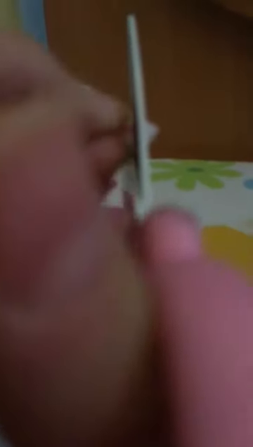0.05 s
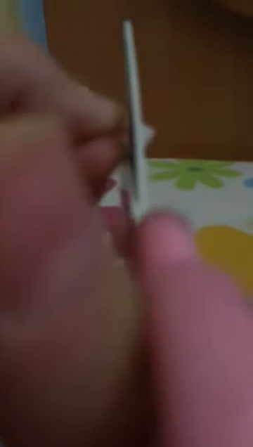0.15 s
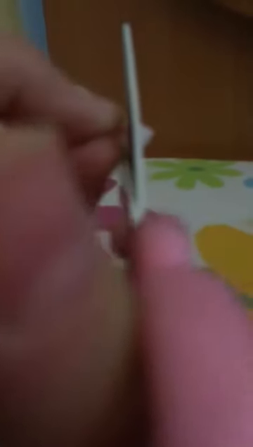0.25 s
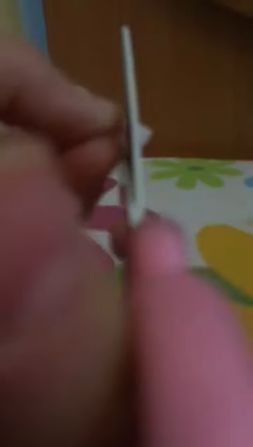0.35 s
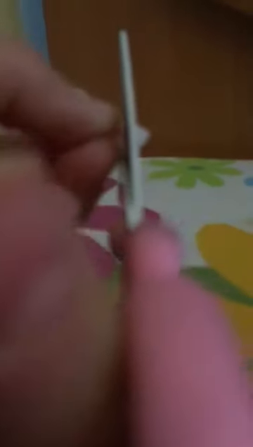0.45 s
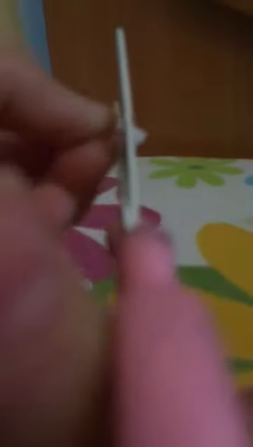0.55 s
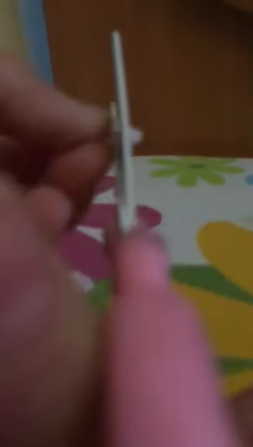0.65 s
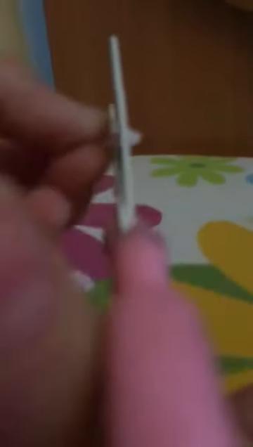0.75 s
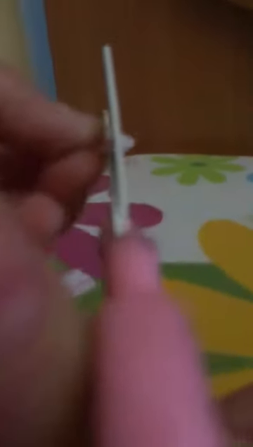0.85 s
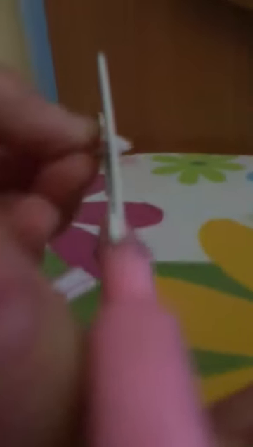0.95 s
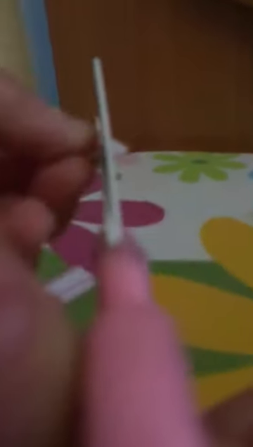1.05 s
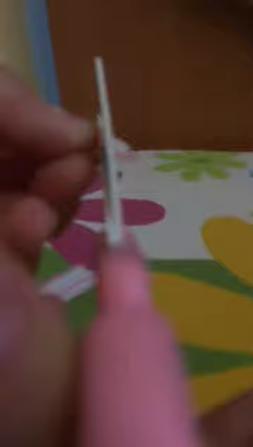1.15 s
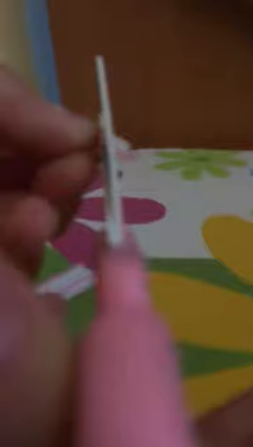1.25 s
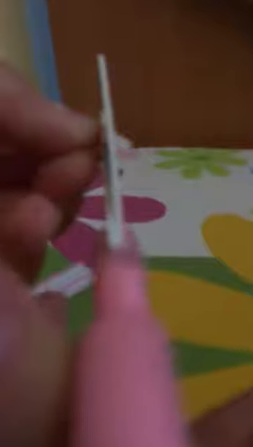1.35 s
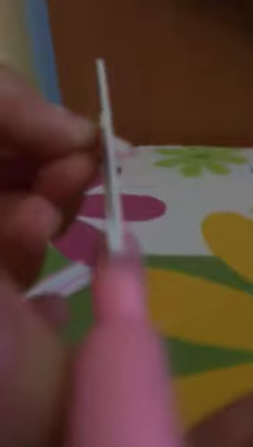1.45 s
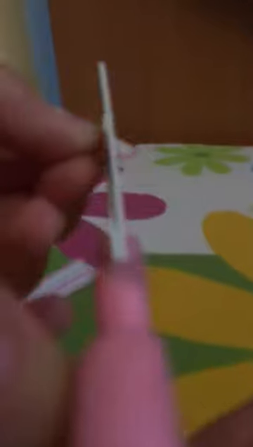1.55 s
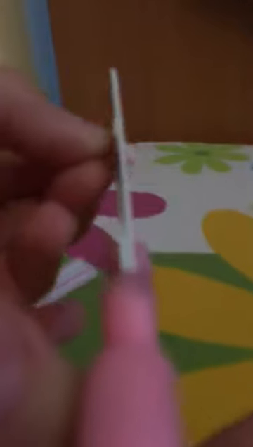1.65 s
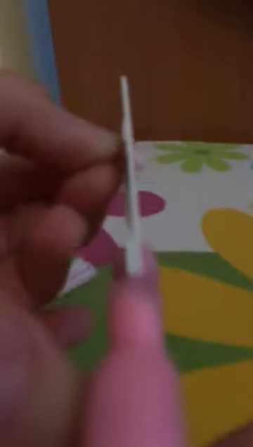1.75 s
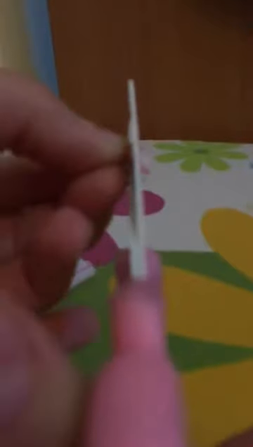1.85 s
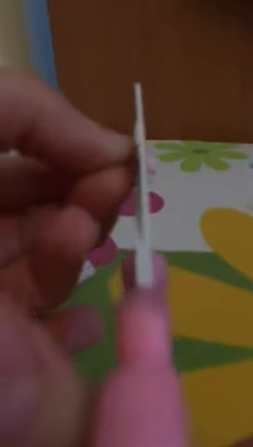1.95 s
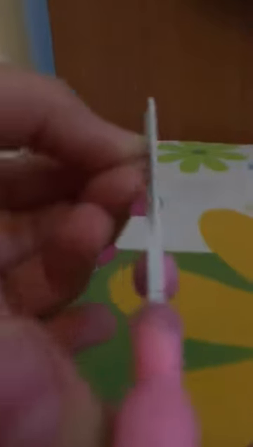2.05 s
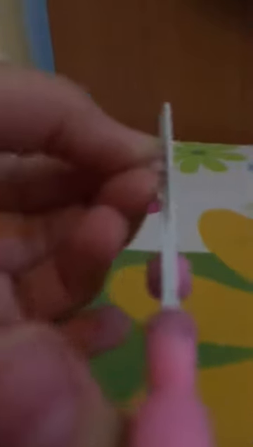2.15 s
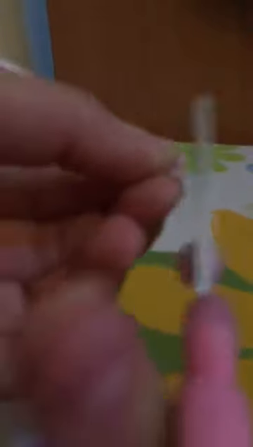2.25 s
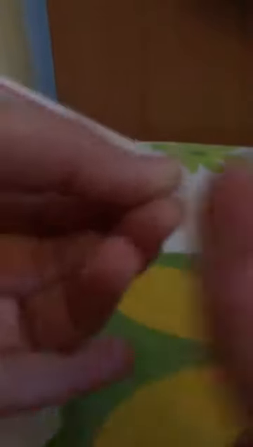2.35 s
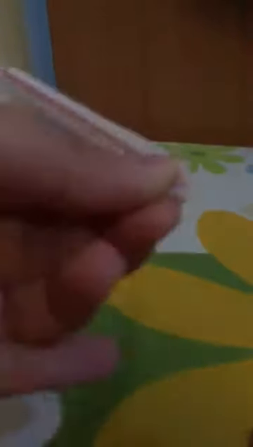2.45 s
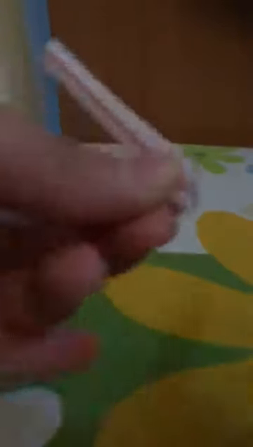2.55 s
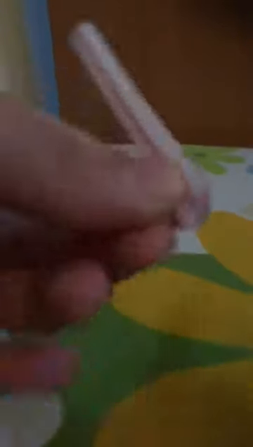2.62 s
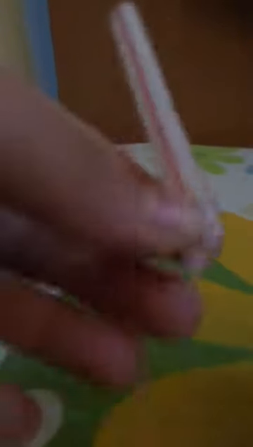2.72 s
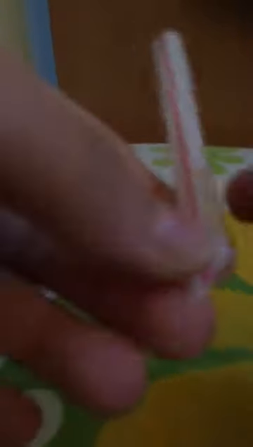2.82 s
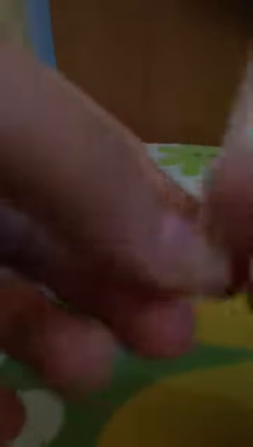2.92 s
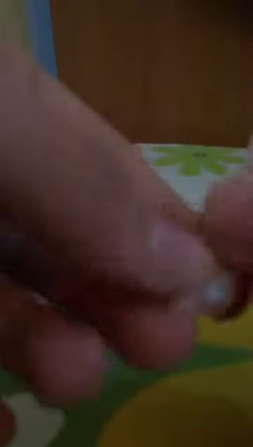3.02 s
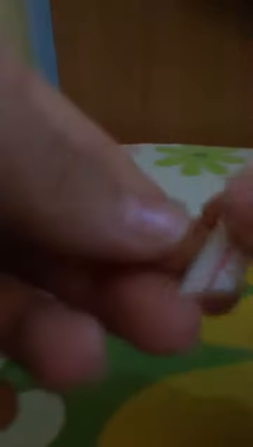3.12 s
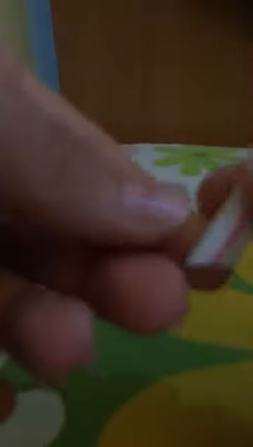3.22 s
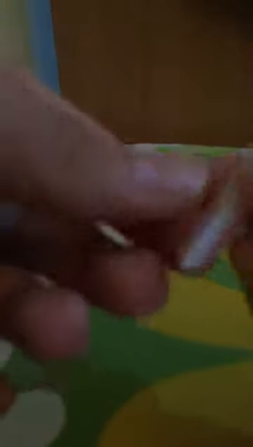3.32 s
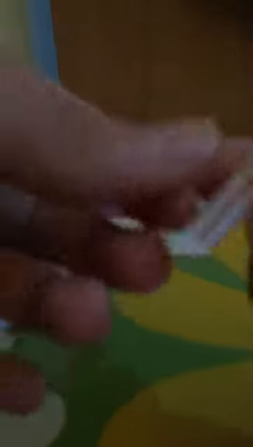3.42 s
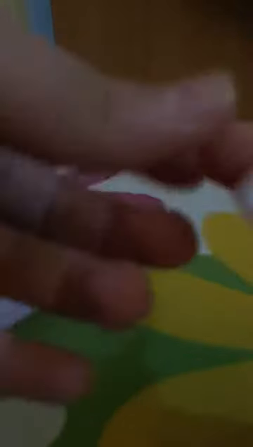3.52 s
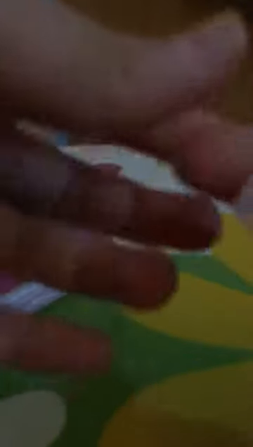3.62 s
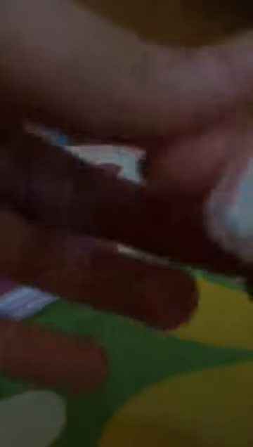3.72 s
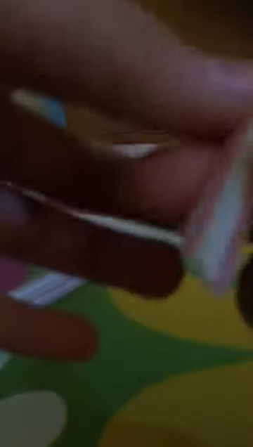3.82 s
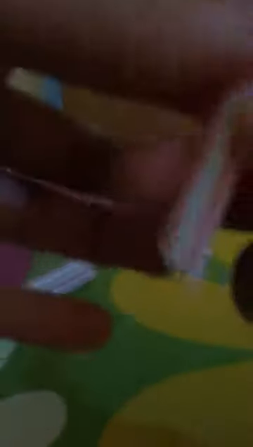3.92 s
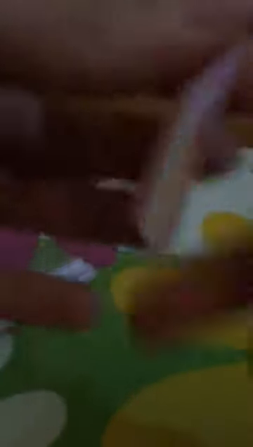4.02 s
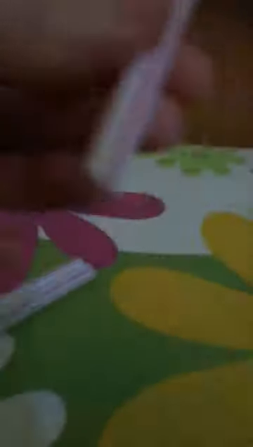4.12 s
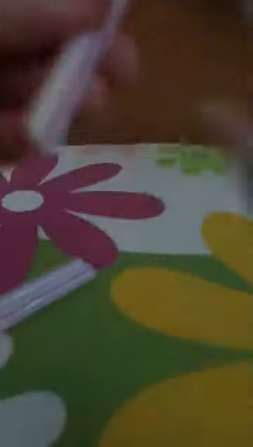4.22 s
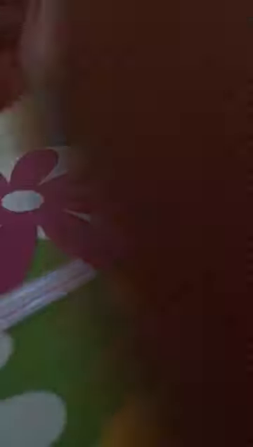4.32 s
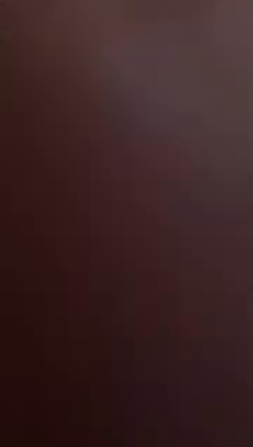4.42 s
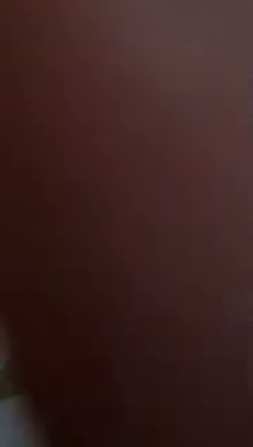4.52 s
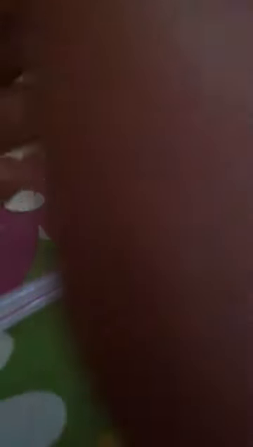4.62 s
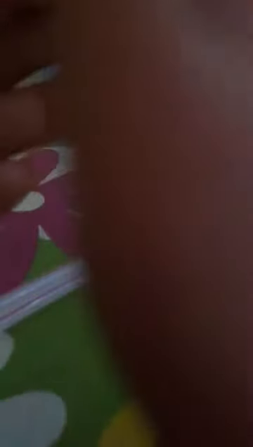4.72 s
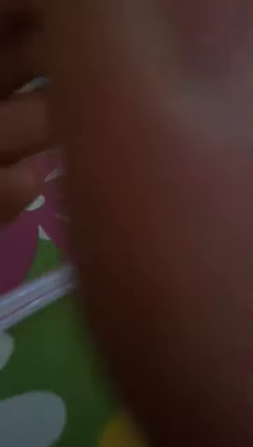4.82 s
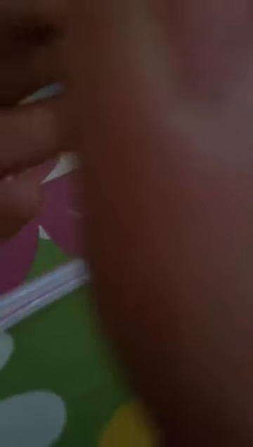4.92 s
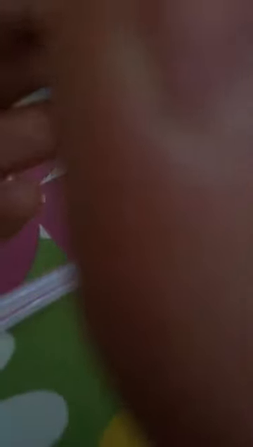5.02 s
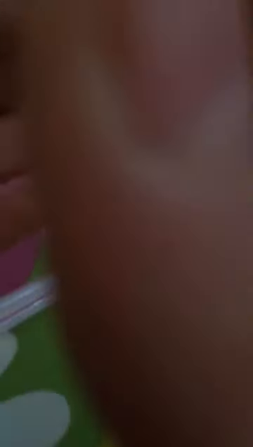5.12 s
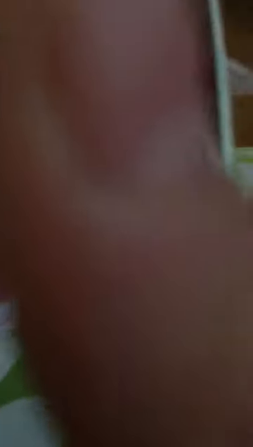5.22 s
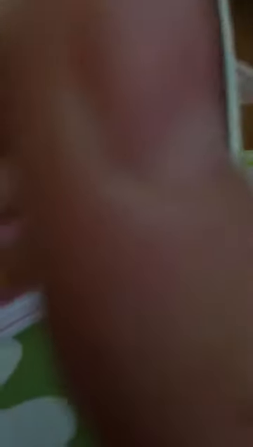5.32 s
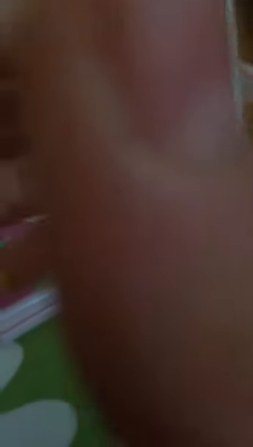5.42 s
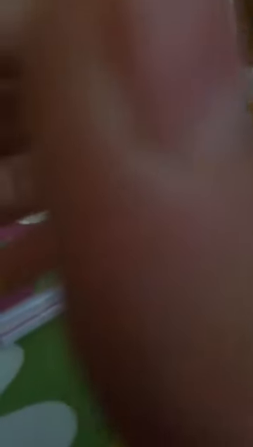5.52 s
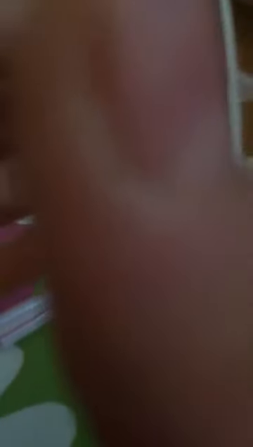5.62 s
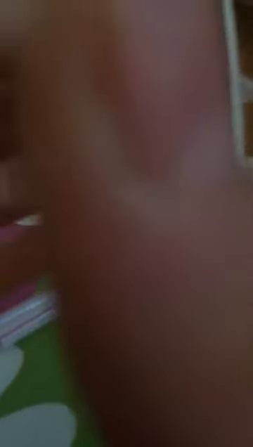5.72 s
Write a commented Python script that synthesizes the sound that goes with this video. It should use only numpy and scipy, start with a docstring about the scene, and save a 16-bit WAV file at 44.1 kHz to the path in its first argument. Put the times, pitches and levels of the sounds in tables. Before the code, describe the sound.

In a small quiet room, very close to a phone microphone, scissors click faintly, creak, then snip through a plastic straw in a quick sharp run. The pinched end pops open loudly, and fingers rub and tap the short piece. A low unsteady appliance hum and soft hiss continue beneath.

```python
"""A small quiet room, a phone close by: scissors close on a plastic drinking straw. Stick-slip noise makes the
scrapes, clusters of dying sines the clicks; falling low swings and rattling noise shake the phone's case. The
pinched straw pops open, then fingers rub and tap the cut piece, which rings like a short open pipe: noise and
taps drive its modes. Behind are an appliance's narrow-band hum near 100 Hz, low rumble, faint whines and hiss."""
import sys
import numpy as np
from scipy import signal
from scipy.fft import rfft, irfft, next_fast_len
from scipy.io import wavfile
from scipy.ndimage import uniform_filter1d

SR = 44100
rng = np.random.default_rng(int(sys.argv[2]) if len(sys.argv) > 2 else 0)


def to_linear_factor(level_db):
    """Convert decibel levels (scalar or array-like) to linear amplitude factors."""
    exponent = np.asarray(level_db, float) / 20
    return 10 ** exponent


def wrap_up_sound(samples):
    """Save the sound to the file named by the first command line argument, as 16-bit audio."""
    columns = np.atleast_2d(samples).T
    # keep every value between -1 and 1, then stretch to whole-number steps
    tamed = np.clip(columns, -1, 1)
    steps = np.round(tamed * 32767).astype(np.int16)
    wavfile.write(sys.argv[1], SR, steps)


N = 254456

# Blade and handle clicks. Each row: start in seconds, level in dB, tilt in dB per octave (harder = brighter),
# gain of the outer modes in dB an octave off.
BLADE_CLICKS = [(0.672, -42, -0.5, 5), (0.6798, -52, -7, 1), (0.6874, -50.5, -3, .3), (0.7054, -65, 4, 9),
                (0.7344, -58, 5, -4), (2.077, -31, 16.5, 5), (2.1174, -42, 18.5, 0), (2.1484, -63, -8, -4),
                (2.1574, -45.5, 7.5, 4), (2.1666, -21.5, 11, 3), (2.1874, -56.5, 1.5, 8.5),
                (2.2347, -54, -4.5, 5), (2.3372, -29, 9.5, 4), (2.363, -36, 8.5, -2),
                (3.1313, -36.5, 12, -3.5), (4.2958, -31.5, 3, -8.5), (4.5241, -41, -2.2, 6.5),
                (4.5284, -62.5, -1.5, 16.5), (5.4883, -43, -6, -4), (5.682, -47.5, 9, 7)]
# Modes of the scissors. Each row: pitch in Hz, level in dB, t60 in seconds.
SCISSOR_MODES = [(1770, 0, 0.007), (2650, -0.5, 0.0093), (4250, -1, 0.012), (6600, -1.5, 0.0058),
                 (8570, 1, 0.0055)]
# Blades scraping on the plastic. Each row: peak in seconds, level in dB, rise in seconds, fall in seconds.
BLADE_SCRAPES = [(.67, -53.5, 0.0047, .02), (.72, -80, .15, 0.13), (2.085, -51, 0.024, 0.046),
                 (2.107, -52, 0.044, 0.023), (2.155, -44.5, 0.0067, 0.025), (2.168, -40, .006, 0.012),
                 (2.19, -67.5, 0.045, 0.2), (2.322, -64.5, 0.0068, .08), (4.528, -76, .1, 0.047)]
# Colour of the scrape. Each row: frequency in Hz, relative density in dB per Hz.
SCRAPE_SPECTRUM = [(300, -37), (1500, -13.5), (3000, -9.5), (4000, 0), (5200, 0.5), (6500, -8),
                   (8000, -18.5), (10000, -10), (11200, -30)]
# Scissors creaking under the grip. Each row: peak in seconds, level in dB, rise in seconds, fall in seconds.
GRIP_CREAKS = [(1.59, -65.5, .06, 0.055), (1.71, -65, 0.065, 0.55), (1.95, -72.5, 0.27, .13)]
# Colour of the creak. Each row: frequency in Hz, relative density in dB per Hz.
CREAK_SPECTRUM = [(200, 2.5), (400, -1), (900, -8.5), (1800, -11), (2100, -12.5), (2850, -6), (3600, -16.5),
                  (6000, -19), (10000, -23)]
# Tiny squeaks. Each row: start in seconds, level in dB, pitch in Hz, t60 in seconds.
TINY_SQUEAKS = [(.6715, -45, 1310, 0.016), (.729, -60, 5000, .012), (2.473, -50.5, 1525, 0.032),
                (2.087, -48, 1430, 0.02), (4.215, -57.5, 1540, 0.039), (4.228, -58, 1400, 0.044),
                (4.28, -53, 1270, 0.033), (5.663, -37, 4110, 0.015), (5.662, -47, 5730, 0.018)]

# Taps and creases of the straw. Each row: start in seconds, level of the second mode in dB,
# tilt in dB per octave, gain of the outer modes in dB an octave off.
STRAW_TAPS = [(2.5545, -53.5, 7.5, -3.5), (2.5662, -57, 8.5, -2.5), (3.2266, -49.5, 1, 1),
              (3.2525, -47, 4, -9), (3.4189, -38.5, -4, -8), (3.6391, -59.5, -6, 8.5),
              (4.15, -48.5, -11, 0), (4.7072, -71.5, -15.5, 10.5), (4.7586, -70.5, -16, 11),
              (4.9072, -62.5, -5.5, 15.5), (4.951, -69.5, -18, 7), (4.9794, -72, -6, 7),
              (5.157, -58, -6, 4), (5.1647, -60, -4.5, 16), (5.249, -50.5, -3.5, -0.5),
              (5.307, -37, -11, -12)]
# Air column of the open straw. Each row: pitch in Hz, level in dB, t60 in seconds when tapped.
PIPE_MODES = [(2320, 0, .019), (4700, 0, .014), (7080, 0, .013), (9480, 0, .011)]
# Dry crack of the straw's wall. Each row: pitch in Hz, level in dB, t60 in seconds.
WALL_MODES = [(3300, -20, 0.0017), (5800, -12, .004), (8300, -11.5, .004)]
# The pinched straw springs open. One row: start in seconds, level in dB.
POP_OPEN = (2.5782, -7.8)
# The flattened straw. Each row: pitch in Hz, level in dB, t60 in seconds.
PINCHED_MODES = [(1010, -22.5, 0.0072), (2033, -11, 0.024), (2406, -12, 0.0088), (2950, -7.5, .007),
                 (3451, -16.5, 0.007), (4290, -5, 0.0088), (4720, -3, 0.014), (5900, -11, .005),
                 (6620, -2.5, 0.0056), (7224, 5, 0.0059), (8140, -17, 0.0089), (8600, -10, 0.0079),
                 (9650, 5.5, .0065)]
# Fingers sliding on the straw. Each row: peak in seconds, level of the soft rub in dB, rise in seconds,
# fall in seconds, drive of the rustle over the rub in dB.
FINGER_RUBS = [(3.134, -59.5, .012, 0.021, 6.5), (3.225, -67, 0.019, 0.035, 1),
               (3.268, -61.5, 0.019, 0.024, 5.3), (3.425, -64.5, 0.0093, 0.11, -3),
               (3.446, -60.5, 0.038, 0.032, 1), (3.505, -62, 0.069, 0.14, -2), (3.957, -80, 0.044, 0.11, 9),
               (4.022, -77, 0.0065, 0.043, 15.5), (4.061, -56.5, 0.024, 0.013, 0.8),
               (4.22, -77, 0.013, 0.025, 13), (4.295, -70, 0.042, 0.016, 15.5),
               (4.711, -62, 0.013, .022, -21), (4.917, -56.5, 0.024, 0.046, -11),
               (5.03, -74.5, 0.036, 0.051, -2.5), (5.163, -56.5, 0.019, 0.031, -16.5),
               (5.25, -67.5, 0.15, .2, -5), (5.313, -49.5, 0.035, 0.053, 1),
               (5.492, -58.5, 0.018, 0.015, -10), (5.53, -74, 0.081, 0.22, -1.5),
               (5.687, -61, 0.035, 0.016, -8.5), (5.75, -73, 0.096, 0.09, -11)]
# Colour of the rustle. Each row: frequency in Hz, relative density in dB per Hz.
RUSTLE_SPECTRUM = [(1200, -45), (2500, -20), (4700, 5.5), (6000, 3), (8000, -2), (9600, 3), (10300, -43),
                   (11200, -90)]
# Straw with a finger over one end. Each row: pitch in Hz, level in dB, t60 in seconds.
COVERED_MODES = [(1500, -11.5, 0.032), (3640, 5, 0.0092), (4750, -6, 0.0038), (6100, -8, 0.012),
                 (8160, -11.5, 0.016)]
# Sliding on the covered straw. Each row: peak in seconds, level in dB, rise in seconds, fall in seconds.
COVERED_RUBS = [(4.218, -69, .013, .1), (4.264, -57.5, 0.03, 0.047), (4.285, -66, 0.055, .01)]
# Taps on the covered straw. Each row: start in seconds, level in dB.
COVERED_STRAW_TAPS = [(4.2682, -36)]

# Bumps through the phone's case, and the low thud of the straw popping open at 2.5786 s. Each row: start in
# seconds, level in dB, starting pitch in Hz, t60 in seconds.
CASE_BUMPS = [(0.671, -48, 248, 0.037), (1.582, -51, 400, 0.055), (2.085, -46.5, 410, 0.025),
              (2.1665, -38, 545, 0.09), (2.171, -27, 148, 0.066), (2.234, -42.5, 450, 0.063),
              (2.422, -47, 480, 0.036), (2.5786, -47.5, 901, .015), (4.5236, -31.5, 890, 0.012),
              (4.5258, -24, 277, 0.038), (4.531, -27.5, 93, .055), (4.553, -46, 397, 0.035)]
# Case rattling in the hand. Each row: peak in seconds, level in dB, rise in seconds, fall in seconds.
CASE_RATTLES = [(2.095, -56, 0.041, 0.036), (2.17, -46.5, 0.016, 0.032), (2.24, -59, 0.043, 0.068),
                (2.42, -64.5, .2, 0.16), (4.53, -55.5, .008, 0.096), (4.555, -62, 0.028, 0.039)]
# Colour of the rattle. Each row: frequency in Hz, relative density in dB per Hz.
RATTLE_SPECTRUM = [(120, -4), (300, 4), (700, -10), (1500, -15.5), (3000, -28.5)]

# Decay of the room. Each row: frequency in Hz, t60 in seconds.
ROOM_DECAY = [(300, .25), (2000, .26), (6000, .24), (11000, .2)]
# Nearest surfaces. Each row: delay in seconds, level in dB.
NEAR_ECHOES = [(0.0138, -31), (.024, -38.5)]

# Hum outside its dips. Each row: time in seconds, level in dB.
HUM_LEVEL = [(0, -50.5), (.39, -51), (.75, -50.5), (1.01, -59.5), (1.2, -50), (1.5, -54.5), (2.0, -51.5),
             (2.19, -48), (2.31, -52), (2.68, -57), (2.88, -46), (2.94, -53.5), (3.57, -53), (3.86, -56),
             (3.97, -47.5), (4.37, -54.5), (4.65, -49), (5.06, -53), (5.33, -48), (5.45, -52), (5.71, -46),
             (5.77, -50.5)]
# Brief dips of the hum. Each row: centre in seconds, depth in dB.
HUM_DIPS = [(.13, -10), (.43, -23), (.57, -5.5), (1.27, -17), (1.43, -12), (2.25, -8), (3.21, -20.5),
            (3.34, -29), (3.61, -4.5), (3.74, -7), (3.91, -24), (4.58, -15), (4.96, -7), (5.64, -11)]
# Wandering rumble. Each row: time in seconds, level in dB.
RUMBLE_LEVEL = [(0.0, -62.5), (1.3, -58.5), (1.98, -64), (2.19, -62), (2.47, -61.5), (3.74, -64),
                (4.5, -54.5), (4.71, -59.5), (5.43, -55), (5.77, -65)]
# Colour of the rumble. Each row: frequency in Hz, relative density in dB per Hz.
RUMBLE_SPECTRUM = [(20, -37.5), (32, -15.5), (48, 14), (70, 7.5), (85, 0), (110, -46)]
# Faint unsteady tones. Each row: pitch in Hz, level in dB.
FAINT_WHINES = [(1730, -89), (6950, -90.5)]
# Room noise and hiss ahead of its top cut. Each row: frequency in Hz, relative density in dB per Hz.
AIR_SPECTRUM = [(74, -33.5), (125, 1), (187, -1), (256, -12), (516, -22), (598, -20), (803, -24),
                (1230, -26), (1400, -29), (1840, -27), (4880, -31.5), (6800, -33.5), (10200, -36),
                (13300, -68), (22000, -120)]


def scissors():
    """Steel on plastic: stick-slip scrapes and creaks, squeaks of single modes, clicks of mode clusters."""
    scrape = strokes(BLADE_SCRAPES) * coloured(gritty(spread_db=2.5), SCRAPE_SPECTRUM)
    creak = strokes(GRIP_CREAKS) * coloured(gritty(spread_db=2), CREAK_SPECTRUM)
    squeaks = np.zeros(N)
    for s, db, hz, t60_s in TINY_SQUEAKS:
        add(squeaks, s, ring([(hz, db, t60_s)], attack_s=0.0022))
    centre_hz = SCISSOR_MODES[2][0]
    clicks = blows(BLADE_CLICKS, SCISSOR_MODES, centre_hz, attack_s=0.00037, spread=0.22, count=10)
    return scrape + creak + squeaks + clicks


def straw():
    """Everything the straw does: taps, the pop and the rubbing."""
    return straw_taps() + straw_pop() + straw_rubs()


def straw_taps():
    """A tap rings the open air column and cracks the wall; covering one end changes the modes."""
    centre_hz = PIPE_MODES[1][0]
    out = blows(STRAW_TAPS, PIPE_MODES, centre_hz, attack_s=0.00065, spread=0.014, count=1)
    out += blows(STRAW_TAPS, WALL_MODES, centre_hz, attack_s=0.0003, spread=0.2, count=6)
    for s, db in COVERED_STRAW_TAPS:
        add(out, s, to_linear_factor(db) * ring(COVERED_MODES, attack_s=0.00026))
    return out


def straw_pop():
    """Springing open strikes all modes of the flattened straw at once."""
    out = np.zeros(N)
    s, db = POP_OPEN
    add(out, s, to_linear_factor(db) * ring(PINCHED_MODES, attack_s=0.00031))
    return out


def straw_rubs():
    """Friction drives the air column: a soft rub its lowest mode, a rustle the upper ones."""
    soft_gain = strokes([row[:4] for row in FINGER_RUBS])
    rustle_gain = strokes([(s, db + over, rise, fall) for s, db, rise, fall, over in FINGER_RUBS])
    # the finger pad damps the mode it drives
    damped = [(hz, db, 0.7 * t60_s) for hz, db, t60_s in PIPE_MODES[:1]]
    soft = soft_gain * sounded(damped, spread_db=3.5)
    covered = strokes(COVERED_RUBS) * sounded(COVERED_MODES, spread_db=0.5)
    upper = 0.75 * sounded(PIPE_MODES[1:], spread_db=4)
    surface = 0.7 * coloured(gritty(spread_db=1.5), RUSTLE_SPECTRUM)
    return soft + covered + rustle_gain * (upper + surface)


def case_bumps():
    """A knock on the case, or the low thud of the pop, is a swing that slows as it dies; the case then rattles
    as gritty noise."""
    out = np.zeros(N)
    t = np.arange(SR // 4) / SR
    slowing = 0.6  # 1 = steady pitch
    for s, db, hz, t60_s in CASE_BUMPS:
        cycles = ((hz * t + 1) ** slowing - 1) / slowing
        add(out, s, to_linear_factor(db - 60 * t / t60_s) * np.sin(2 * np.pi * cycles))
    return out + strokes(CASE_RATTLES) * coloured(gritty(spread_db=3), RATTLE_SPECTRUM)


def room(x, tail_db):
    """Two near echoes, then a noise tail that builds up while each frequency dies at its own speed."""
    hz, t, z = signal.stft(rng.standard_normal(SR // 2), SR, nperseg=256)
    decay = to_linear_factor(-60 * t / along(ROOM_DECAY, hz)[:, None])
    buildup = 1 - 0.79 * np.exp(-(t / 0.031) ** 2)
    tail = signal.istft(z * decay * buildup, SR, nperseg=256)[1]
    tail = tail * to_linear_factor(tail_db) / np.linalg.norm(tail)
    response = np.pad(tail, (SR // 200, 0))  # tail starts 5 ms late
    for delay_s, db in NEAR_ECHOES:
        response[round(delay_s * SR)] += to_linear_factor(db)
    return signal.fftconvolve(x, response)[:N]


def background():
    """Sum of the steady sources."""
    return hum() + rumble() + whines() + hiss()


def hum():
    """The appliance: a narrow noise band that wavers and dips briefly."""
    t = np.arange(N) / SR
    half_dip_s = 0.039
    dips_db = sum(db * np.maximum(1 - abs(t - s) / half_dip_s, 0) for s, db in HUM_DIPS)
    return gains(HUM_LEVEL) * to_linear_factor(dips_db) * narrow(100.94, width_hz=7.6)


def rumble():
    """Low noise of wandering level."""
    return gains(RUMBLE_LEVEL) * coloured(rng.standard_normal(N), RUMBLE_SPECTRUM)


def whines():
    """Narrow noise bands heard as faint unsteady tones."""
    return sum(to_linear_factor(db) * narrow(hz, width_hz=29) for hz, db in FAINT_WHINES)


def hiss():
    """Room noise and microphone hiss: coloured noise that ends abruptly at the top."""
    noise = coloured(rng.standard_normal(N), AIR_SPECTRUM)
    return to_linear_factor(-61.5) * filtered(noise, lambda hz: 1 / (1 + (hz / 10400) ** 140))


def blows(events, modes, centre_hz, attack_s, spread, count):
    """Contacts strike the same modes; hardness tilts them, place favours the outer or the middle ones."""
    out = np.zeros(N)
    octaves = np.log2(np.array(modes)[:, 0] / centre_hz)
    for s, db, tilt, bend in events:
        struck = [(hz, mode_db + tilt * x + bend * x ** 2, t60_s)
                  for (hz, mode_db, t60_s), x in zip(modes, octaves)]
        add(out, s, to_linear_factor(db) * ring(struck, attack_s, spread, count))
    return out


def ring(modes, attack_s, spread=0, count=1):
    """One blow: each mode is a cluster of count dying sines; a wide cluster makes a dry crack."""
    t = np.arange(SR // 10) / SR
    hz, db, t60_s = np.repeat(np.asarray(modes, float), count, axis=0).T[:, :, None]
    detune = 1 + spread * rng.uniform(-1.3, 1, hz.shape)
    if count > 1:
        sign = np.where(rng.random(hz.shape) < 0.5, -1, 1)
    else:
        sign = (-1.0) ** np.arange(len(hz))[:, None]
    waves = sign * to_linear_factor(db - 60 * t / t60_s) * np.sin(2 * np.pi * hz * detune * t)
    onset = 1 - np.exp(-(t / attack_s) ** 2)
    return waves.sum(0) * onset / np.sqrt(count)


def sounded(modes, spread_db):
    """Friction noise through resonances, rms 1; a mode's width follows from its decay."""
    def column(f):
        total = 0
        for hz, db, t60_s in modes:
            width_hz = np.log(1000) / np.pi / t60_s
            drag = 1j * f * width_hz
            total = total + to_linear_factor(db) * drag / (hz * hz - f * f + drag)
        return total
    return unit(filtered(gritty(spread_db), column))


def gritty(spread_db):
    """Stick-slip noise: its size jumps about every millisecond and clumps every six."""
    slips = np.repeat(rng.standard_normal(N // 40 + 1), 40)[:N]
    clumps = np.repeat(rng.standard_normal(N // 260 + 1), 260)[:N]
    clumps = uniform_filter1d(clumps, 90)
    return rng.standard_normal(N) * to_linear_factor(spread_db * (slips + 0.8 * clumps))


def narrow(hz, width_hz):
    """A narrow noise band with its swings flattened, rms 1: an unsteady tone."""
    noise = rng.standard_normal(N)
    band = signal.hilbert(filtered(noise, lambda f: np.exp(-((f - hz) / width_hz) ** 2)))
    return unit((band / np.abs(band) ** 0.55).real)


def strokes(rows):
    """A gain per sample: each stroke climbs 20 dB in its rise time and drops 20 dB in its fall time."""
    t = np.arange(N) / SR
    return sum(to_linear_factor(db - 20 * np.maximum((s - t) / rise_s, (t - s) / fall_s))
               for s, db, rise_s, fall_s in rows)


def gains(rows):
    """A gain per sample from (s, dB) rows."""
    s, db = np.transpose(rows)
    return to_linear_factor(np.interp(np.arange(N) / SR, s, db))


def coloured(x, spectrum):
    """x shaped by a spectrum, rms 1."""
    return unit(filtered(x, lambda hz: to_linear_factor(along(spectrum, hz))))


def filtered(x, response):
    """x times a complex response of frequency."""
    m = next_fast_len(N + SR // 2)
    return irfft(rfft(x, m) * response(np.fft.rfftfreq(m, 1 / SR)), m)[:N]


def along(points, hz):
    """(Hz, value) points read on a log axis."""
    f, v = np.transpose(points)
    return np.interp(np.log(hz + 1), np.log(f + 1), v)


def unit(x):
    """x scaled to rms 1."""
    return x / np.sqrt(np.mean(x ** 2) + 1e-20)


def add(track, s, sound):
    """Mixes a sound in at time s."""
    part = track[round(s * SR):][:len(sound)]
    part += sound[:len(part)]


def scene():
    """Hands close to the phone with their room sound, case bumps and background dry."""
    near = scissors() + straw()
    return (near + room(near, tail_db=-30) + case_bumps() + background())[None]


def band_limit(x):
    """A steep low-pass at the top of the band."""
    return signal.sosfilt(signal.butter(12, 11270, fs=SR, output="sos"), x)


def record(dry):
    """The phone cuts the deepest bass, rolls off steeply near 10.8 kHz and limits peaks softly at 0.97."""
    def response(hz):
        bass_cut = (1j * hz / (1j * hz + 25)) ** 2
        return bass_cut / (1 + (hz / 10850) ** 45)
    band = filtered(dry[0], response)
    limited = band / (1 + abs(band / 0.97) ** 12) ** (1 / 12)
    return band_limit(limited[None])


dry = scene()
out = record(dry)
wrap_up_sound(out)
```